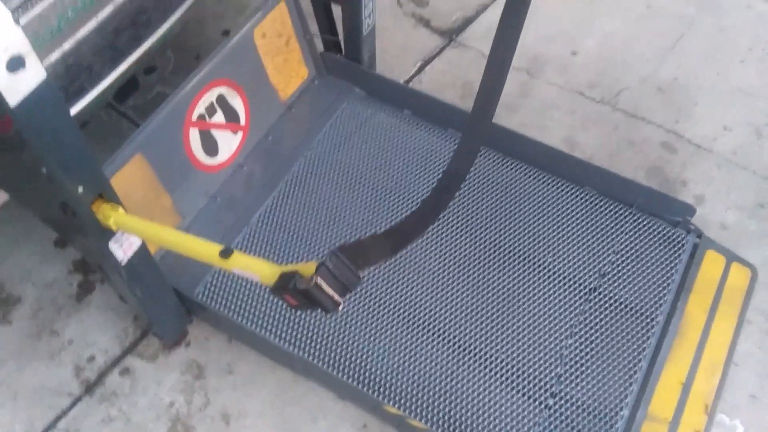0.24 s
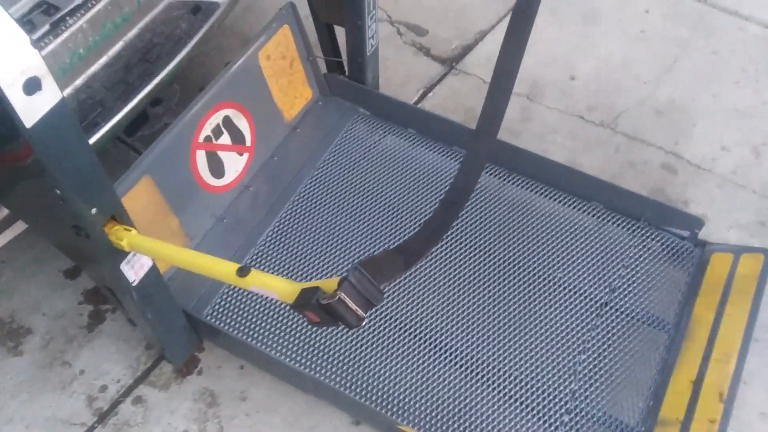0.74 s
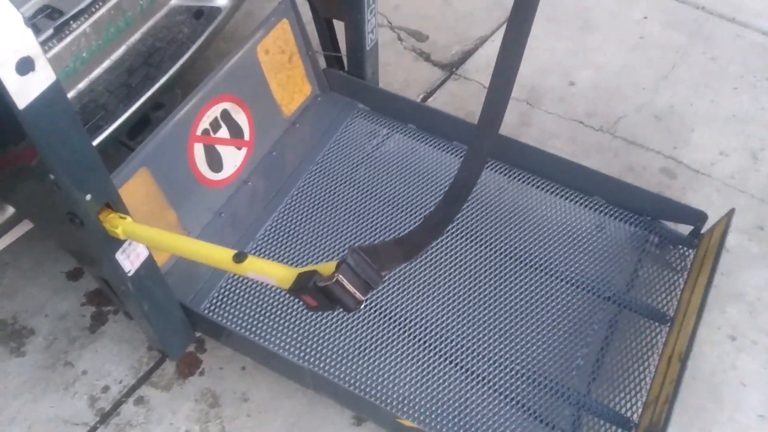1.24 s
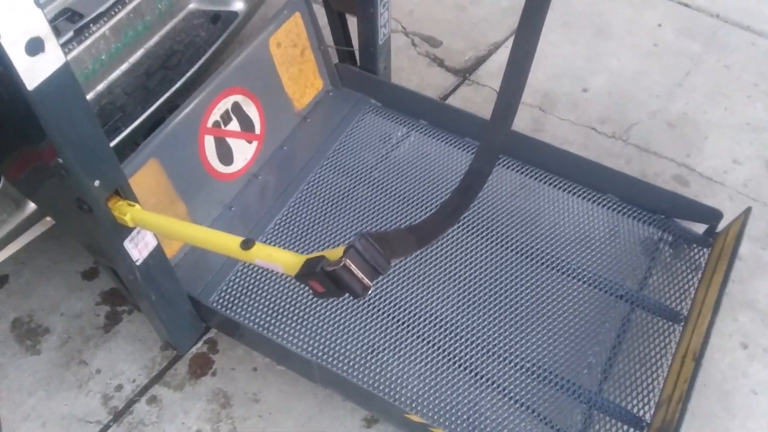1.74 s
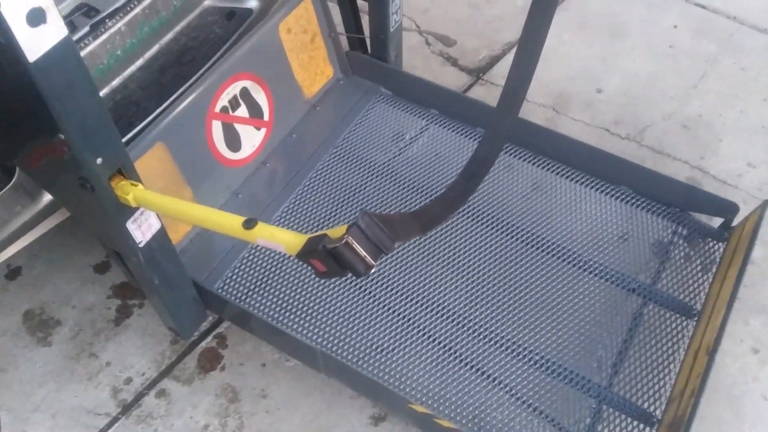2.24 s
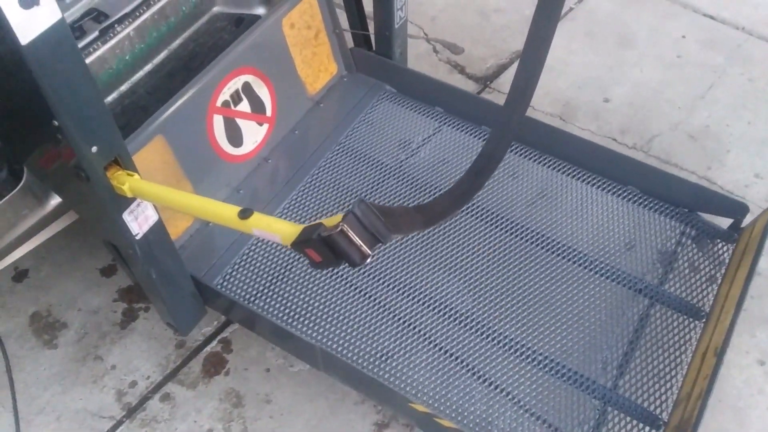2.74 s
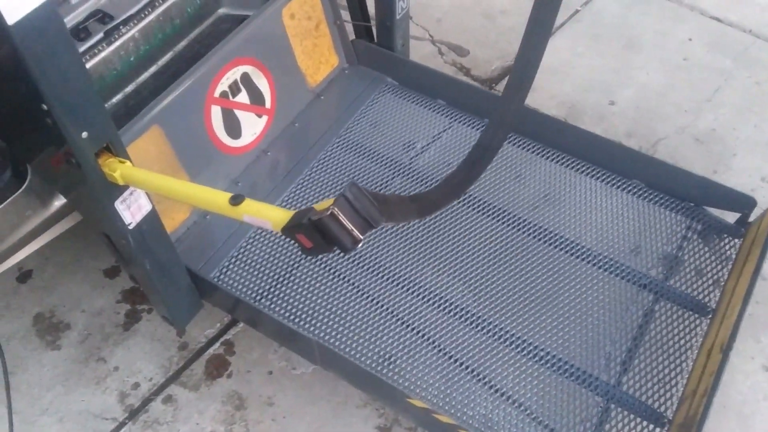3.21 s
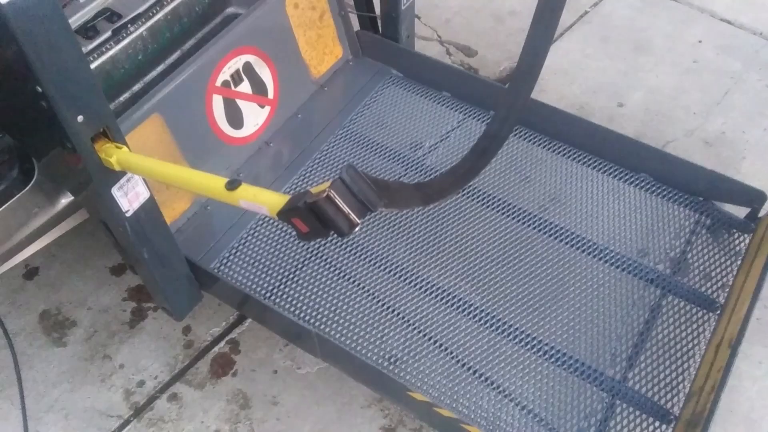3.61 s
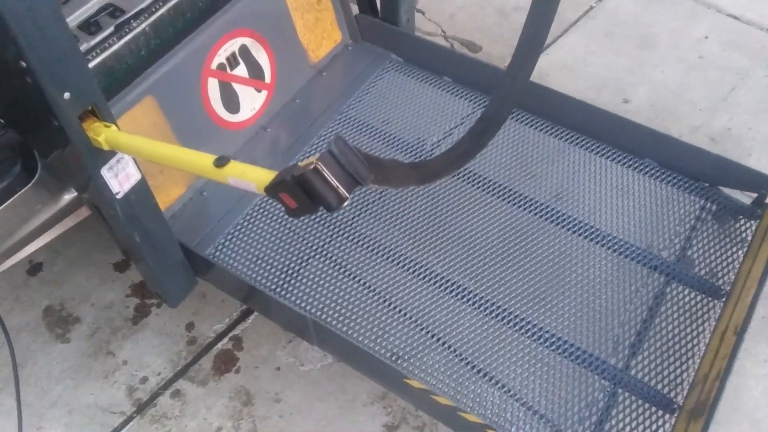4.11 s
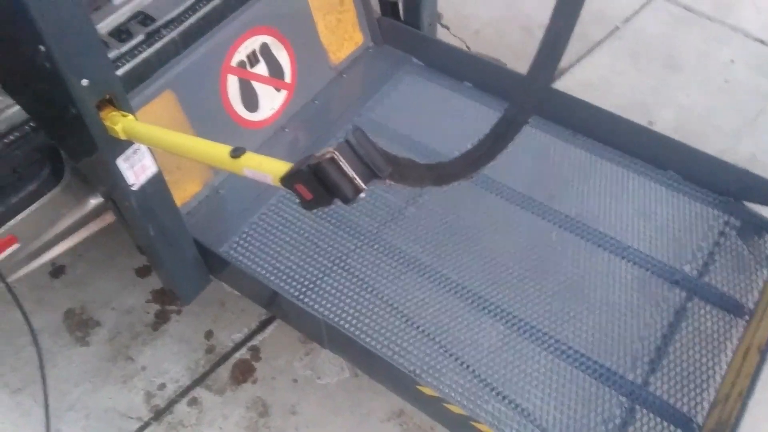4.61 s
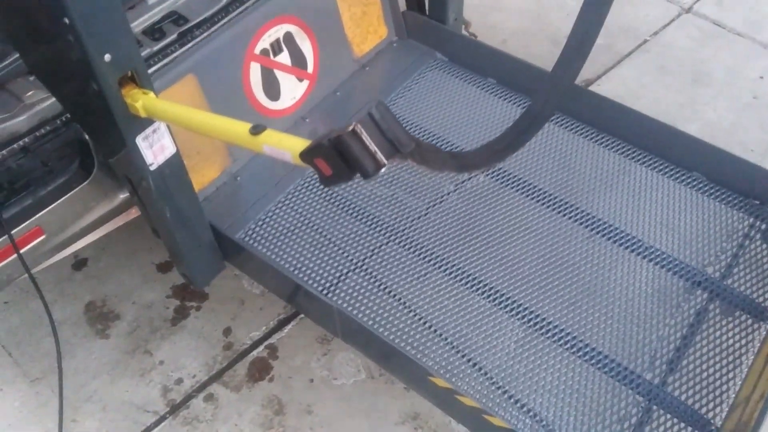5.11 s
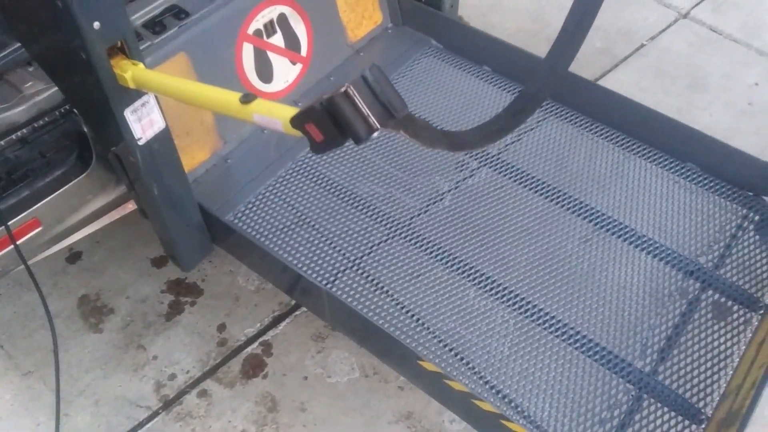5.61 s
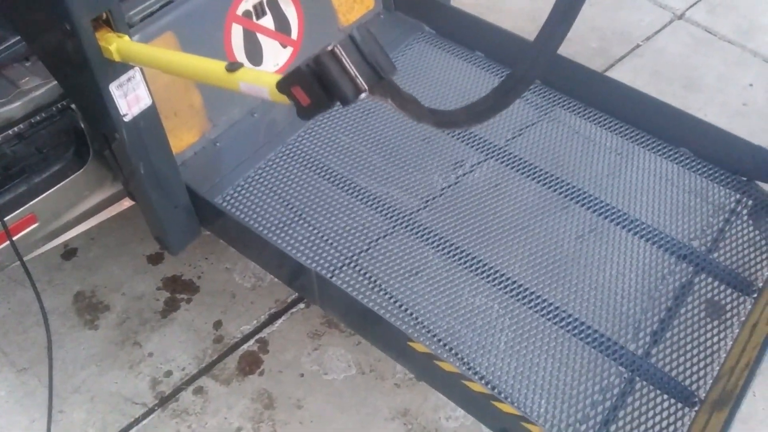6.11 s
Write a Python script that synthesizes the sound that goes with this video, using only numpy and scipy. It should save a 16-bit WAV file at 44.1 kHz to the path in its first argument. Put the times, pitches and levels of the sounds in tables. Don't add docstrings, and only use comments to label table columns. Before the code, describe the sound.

Continuous mechanical whine of a lift motor, already running and never stopping: a low-mid gear hum, a piercing high tone of about six kilohertz and grainy hiss. Individual tones shimmer and beat slowly. A crisp hinge click with a tiny rebound lands early among dull thuds, and low, muffled knocks return near the end. Dry, near, same in both channels, phone quality.

```python
import sys
import numpy as np
from scipy import signal
from scipy.fft import rfft, irfft, next_fast_len
from scipy.io import wavfile
from scipy.ndimage import uniform_filter1d, map_coordinates

SR = 44100
rng = np.random.default_rng(int(sys.argv[2]) if len(sys.argv) > 2 else 0)


def materialize(psi):
    bounded = np.clip(np.atleast_2d(psi).T, -1, 1)
    quanta = np.round(bounded * 32767).astype(np.int16)
    wavfile.write(sys.argv[1], SR, quanta)


def invert_db(level):
    return 10 ** (np.asarray(level, dtype=float) / 20)


N = 280035
MID_LIFT_S = 3.2

# time_s, speed_turns_per_s
SHAFT = [(0.0, 89.48), (0.1, 90.28), (0.3, 90.8), (0.55, 89.79), (1.2, 88.94), (1.9, 89.0), (2.4, 88.57),
         (2.95, 88.4), (3.15, 88.73), (3.35, 88.45), (3.65, 88.51), (3.95, 87.97), (4.9, 87.83),
         (5.0, 88.31), (5.4, 87.97), (6.0, 88.12), (6.05, 88.61), (6.3, 88.99)]
# frequency_hz, level_db (in 18 Hz)
OIL_HISS = [(177, -69), (265, -64), (531, -60.5), (708, -58.5), (1239, -60), (1416, -65), (1593, -60),
            (1770, -66.5), (1947, -66), (2124, -70.5), (2389, -72), (3009, -61.5), (3186, -64.5),
            (3717, -69.5)]
# frequency_hz, level_db (in 18 Hz)
BRUSH_HISS = [(3717, -71), (4900, -69), (5300, -62.5), (6000, -66), (6500, -61), (8053, -68), (8938, -78),
              (9558, -72.5), (10354, -79), (11328, -76), (12124, -81), (12744, -75.5), (14600, -80),
              (15400, -76)]
HISS_SPECTRUM = OIL_HISS + BRUSH_HISS[1:]


def unit(x):
    return x / np.sqrt(np.mean(np.abs(x) ** 2, -1, keepdims=True) + 1e-20)


def along(points, hz):
    f, v = np.transpose(points)
    return np.interp(np.log(hz + 1), np.log(f + 1), v)


def curves(rows, t):
    s, *columns = np.transpose(rows)
    return np.array([np.interp(t, s, column) for column in columns])


def wander(count, t, rate):
    knots = rng.standard_normal((count, 400))
    return np.array([map_coordinates(k, [t * rate]) for k in knots])


def filtered(x, response):
    size = next_fast_len(N + 8192)
    return irfft(rfft(x, size) * response(np.fft.rfftfreq(size, 1 / SR)), size)[..., :N]


def shaft_angle():
    return np.cumsum(curves(SHAFT, np.arange(N) / SR)[0]) / SR


def hiss(angle):
    # time_s, oil_level_db, brush_level_db
    load_levels = [(0.0, -1, -0.5), (6.35, -0.5, 0)]
    oil_db, brush_db = curves(load_levels, np.arange(N) / SR)
    rumble = [(20, -56), (60, -70.5), (110, -75)]

    def colour(hz):
        return invert_db(along(rumble + HISS_SPECTRUM, hz) + 31.0)

    def oil_share(hz):
        return 1 / (1 + (hz / 3700) ** 4)

    oil = filtered(rng.standard_normal(N), lambda hz: colour(hz) * np.sqrt(oil_share(hz)))
    pulse = unit(1 + 0.15 * np.cos(2 * np.pi * angle) + 0.22 * np.cos(4 * np.pi * angle + 1))
    brush = filtered(pulse * rng.standard_normal(N), lambda hz: colour(hz) * np.sqrt(1 - oil_share(hz)))
    return invert_db(oil_db) * oil + invert_db(brush_db) * brush


def frame():
    # start_s, peak_db, mode_hz, t60_s
    knocks = [(0, -36, 545, .1), (.046, -35, 630, .1), (.078, -36, 650, .09), (.185, -38, 640, .12),
              (.256, -36, 550, .16), (.262, -39, 800, .1), (.3, -38, 500, .14), (.335, -39, 650, .1),
              (4.059, -41, 390, .13), (5.76, -37, 330, .06), (5.762, -38, 200, .06), (5.872, -37, 400, .08),
              (5.874, -42, 270, .06), (5.912, -36, 430, .07), (5.914, -37, 310, .06),
              (5.917, -35, 190, .06)]
    out, t = np.zeros(N + SR), np.arange(SR // 3) / SR
    onset = 1 - np.exp(-t / 0.0017)
    for start_s, db, hz, t60 in knocks:
        decay = invert_db(db + 4.5 - 60 * t / t60)
        out[round(abs(start_s) * SR):][:len(t)] += decay * onset * np.sin(2 * np.pi * hz * t)
    return out[:N]


def flap():
    # start_s, peak_db
    clicks = [
        (.2103, -14.5),
        (.2165, -26),
    ]
    # frequency_hz, level_db, t60_s
    hinge_modes = [(2590, -9, .04), (4540, -2, .016), (5850, 0, .016), (6940, -2, .016), (8100, -2, .012),
                   (13000, -12, .01)]
    out, t = np.zeros(N + SR), np.arange(SR // 8) / SR
    onset = 1 - np.exp(-t / 0.0003)
    for start_s, db in clicks:
        ring = 0
        for hz, level_db, t60 in hinge_modes:
            ring = ring + invert_db(level_db - 60 * t / t60) * np.cos(2 * np.pi * hz * (t - 0.0006))
        crack = 0.98 * invert_db(-60 * t / 0.011) * np.diff(rng.standard_normal(len(t) + 1))
        out[round(start_s * SR):][:len(t)] += invert_db(db - 8.5) * onset * (ring + crack)
    return out[:N]


def bearing(angle):
    # shaft_multiple, level_db
    ball_tones = [(3.42, -67), (4.42, -66), (7.33, -61), (7.42, -62), (7.655, -64), (8.345, -59),
                  (8.655, -61), (9.345, -59), (10.345, -61), (10.655, -61), (11.345, -62), (11.655, -63),
                  (12.31, -58), (12.655, -65), (13.31, -62), (13.655, -62), (14.33, -61), (14.655, -63),
                  (15.655, -65), (16.655, -63), (17.31, -61), (17.655, -61), (18.31, -52.5), (19.31, -65),
                  (24.31, -74), (25.31, -73), (27.655, -73), (29.31, -70)]
    t, sample_t = np.arange(0, N + 256, 256) / SR, np.arange(N) / SR
    orders, db = np.transpose(ball_tones)
    settle_db = -1.2 * (t - MID_LIFT_S) * (orders[:, None] > 17)
    swell = invert_db(db[:, None] + 1.5 + settle_db) * unit(invert_db(2.4 * wander(count=len(db), t=t, rate=2.5)))
    slip = rng.uniform(0, 2 * np.pi, (len(db), 1)) + 0.6 * wander(count=len(db), t=t, rate=5.5)
    out = np.zeros(N)
    for order, gain, phase in zip(orders, swell, slip):
        tone = np.sin(2 * np.pi * order * angle + np.interp(sample_t, t, phase))
        out += np.sqrt(2) * np.interp(sample_t, t, gain) * tone
    return out


def swells(t):
    # shaft_multiple, mid_lift_db, drift_db_per_s
    moving_tones = [(3, -59.2, 2.4), (6, -50.9, -0.9), (7, -53.5, -1.0), (8, -48.7, 0.8), (9, -48.3, 1.1),
                    (10, -43.7, 1.4), (12, -52.9, 0.4), (14, -48.5, 2.0), (18, -43.7, -0.2),
                    (23, -52.7, -2.8), (29, -55.7, -0.6), (33, -52.1, -0.3), (34, -46.1, -0.9),
                    (36, -52.6, -1.1), (46, -54.4, 0.1), (59, -60.6, 0.3), (66, -56.0, -0.6),
                    (70, -53.1, 0.4), (71, -53.9, 0.9), (73, -47.5, 1.9), (74, -46.6, -0.0),
                    (107, -63.2, 0.9), (108, -53.9, -0.6), (113, -63.2, 1.3), (129, -69.5, 3.0),
                    (144, -62.4, -0.1)]
    # shaft_multiple,
    # amplitude_share, swell_period_s, loudest_s
    path_echoes = [(3, 0.3, 6.78, 2.4), (6, 0.35, 3.82, 6.35), (7, 0.29, 5.05, 0.38),
                   (8, 0.13, 0.9, 3.76), (9, 0.13, 3.57, 0.64), (10, 0.08, 1.38, 2.63),
                   (12, 0.51, 5.27, 3.56), (14, 0.24, 5.56, 3.04), (18, 0.11, 0.89, 2.61),
                   (23, 0.41, 2.32, 3.97), (29, 0.53, 7.0, 4.99), (33, 0.18, 0.74, 2.62),
                   (34, 0.4, 5.04, 3.82), (36, 0.8, 3.45, 3.11), (46, 0.68, 2.72, 3.07),
                   (59, 0.26, 1.29, 2.99), (66, 0.34, 4.09, 6.52), (70, 0.7, 3.32, 3.69),
                   (71, 0.27, 1.46, 2.61), (73, 0.36, 3.06, 2.91), (74, 0.31, 1.5, 2.59),
                   (107, 0.24, 1.96, 4.16), (108, 0.74, 4.45, 3.22), (113, 0.29, 1.43, 3.85),
                   (129, 0.37, 1.72, 3.55), (144, 0.35, 3.83, 1.17),
                   (8, 0.24, 4.58, 2.76), (10, 0.15, 3.15, 2.07), (12, 0.34, 2.8, 3.22),
                 (18, 0.34, 5.19, 2.94), (23, 0.65, 7.0, 5.75), (23, 0.23, 1.16, 2.95),
                 (29, 0.27, 1.55, 4.2), (33, 0.18, 7.0, 3.31), (34, 0.54, 4.47, 2.11),
                 (36, 0.74, 4.26, 0.5), (36, 0.62, 3.75, 2.07), (46, 0.41, 2.64, 1.92),
                 (46, 0.16, 1.57, 2.94), (59, 0.48, 2.52, 2.94), (66, 0.42, 1.51, 2.6),
                 (70, 0.35, 3.13, 1.66), (71, 0.8, 4.83, 1.87), (73, 0.61, 1.82, 3.24),
                 (73, 0.23, 1.68, 2.36), (74, 0.34, 1.4, 3.35), (74, 0.24, 6.65, 1.94),
                 (107, 0.75, 5.0, -0.18), (108, 0.6, 3.18, 4.7), (108, 0.42, 2.93, 0.32),
                 (113, 0.47, 2.65, 2.6), (129, 0.36, 1.34, 2.64), (144, 0.33, 1.7, 4.39),
                 (144, 0.25, 0.99, 2.56)]
    gain = {order: invert_db(db + drift * (t - MID_LIFT_S)) for order, db, drift in moving_tones}
    for order, share, period_s, loudest_s in path_echoes:
        echo = share * np.exp(2j * np.pi * (t - loudest_s) / period_s)
        gain[order] = gain[order] * np.abs(1 + echo)
    return gain


def whine(angle):
    # shaft_multiple, level_db
    clear_tones = [(5, -58), (13, -53), (17, -56), (19, -57), (20, -56), (28, -64), (30, -61), (32, -58),
                   (37, -56), (38, -56), (39, -61), (40, -61), (44, -63), (45, -61), (47, -61), (53, -61),
                   (54, -60), (57, -58),
                   (64, -57), (69, -57), (75, -55), (76, -53), (80, -55), (90, -57), (92, -60), (93, -62),
                   (104, -65), (106, -66), (109, -58), (115, -64), (122, -65), (126, -66), (128, -64),
                   (130, -62), (132, -67), (133, -68), (135, -67), (145, -67), (149, -67), (178, -70),
                   (112, -69), (124, -69), (125, -69), (148, -70), (62, -66), (63, -59), (140, -70),
                   (160, -69)]
    # time_s, level_db
    slot_levels = [(0.0, -51.0), (0.25, -39.8), (0.4, -48.8), (0.9, -36.4), (1.55, -41.0), (2.05, -35.9),
                   (2.4, -39.2), (2.85, -38.0), (3.35, -46.3), (3.9, -41.3), (4.1, -40.7), (4.35, -34.2),
                   (4.9, -37.2), (5.05, -45.7), (5.25, -39.1), (5.45, -45.2), (5.95, -37.2), (6.3, -35.4)]
    # frequency_hz, excess_db
    faint_excess = [(300, -3), (2200, 4), (3600, 0), (5000, 1), (6800, 3), (7600, 0), (9000, 5.5),
                    (12500, 6), (15000, 3)]
    slot_order, top_order, steps = 72, 179, 2048
    t = np.interp(np.arange(int(angle[-1]) + 2), angle, np.arange(N) / SR)
    k = np.arange(top_order + 1)
    hz = k * np.mean(SHAFT, 0)[1]
    db = along(HISS_SPECTRUM, hz) + along(faint_excess, hz) + 2.5 * rng.standard_normal(len(k))
    for order, level_db in clear_tones:
        db[order] = level_db

    gain = invert_db(db[:, None] + 0.38) * unit(invert_db(2.22 * wander(count=len(k), t=t, rate=1.648)))
    flutter = unit(invert_db(1.0 * wander(count=len(k), t=t, rate=3.1)))
    for order, swell in swells(t).items():
        gain[int(order)] = swell * flutter[int(order)] * invert_db(0.45)
    gain[slot_order] = invert_db(curves(slot_levels, t)[0] + 0.47)
    gain[:2] = 0
    gain[k < 10] *= invert_db(-1.05)

    shake = wander(count=len(k), t=t, rate=14) + 1j * wander(count=len(k), t=t, rate=11)
    loose = 0.094 + 0.16 * (k[:, None] < 10)
    lag_turns = 0.00053 * wander(count=1, t=t, rate=27) + 0.00096 * wander(count=1, t=t, rate=6.7)
    lag_phase = 2 * np.pi * k[:, None] * lag_turns
    phase = rng.uniform(0, 2 * np.pi, (len(k), 1)) + lag_phase
    near = k[70:75, None]
    phase[70:75] = np.pi / 2 * (near % 2) + 1.7 * (near == 74) + lag_phase[70:75]

    spectrum = gain * (1 + loose * shake) * np.exp(1j * phase)
    turns = irfft(spectrum, steps, axis=0) * steps / np.sqrt(2)
    turns = np.vstack([turns, turns[:1]])
    return map_coordinates(turns, [angle % 1 * steps, angle], order=1)


def scene():
    angle = shaft_angle()
    mix = hiss(angle) + frame() + flap() + bearing(angle) + whine(angle)
    return np.tile(mix, (2, 1))


def starve(x):
    starved_frames = [8, 15, 41, 58, 77, 81, 100, 103, 108, 121, 136, 171, 191, 193, 207, 210, 212, 214,
                      223, 228, 242, 246, 261, 286, 289]
    starved_runs = [(61, 2), (112, 2), (152, 2), (160, 2), (163, 2), (182, 2), (201, 2), (238, 3)]
    # frequency_hz, step_db
    coarseness = [(200, 21), (450, 25), (800, 23), (1500, 23), (2500, 26), (4200, 24), (9000, 26),
                  (14000, 25), (15500, 30)]
    hop = round(1024 / 48000 * SR)
    n, k = np.arange(2 * hop) + 0.5, np.arange(hop) + 0.5
    window = np.sin(np.pi * n / (2 * hop))
    basis = window * np.cos(np.pi / hop * np.outer(k, n + hop / 2)) * np.sqrt(2 / hop)
    frames = starved_frames + [first + i for first, count in starved_runs for i in range(count)]
    where = (np.array(frames)[:, None] - 1) * hop - 104 + np.arange(2 * hop)
    lines = x[where] @ basis.T
    around = np.exp(uniform_filter1d(np.log(np.abs(lines) + 1e-9), size=61, axis=1))
    step = around * invert_db(along(coarseness, k * SR / (2 * hop)))
    error = (np.round(lines / step) * step - lines) @ basis
    return x + np.bincount(where.ravel(), error.ravel(), N)


def top_cut(x):
    return signal.sosfilt(signal.butter(12, 16780, fs=SR, output="sos"), x)


def record(dry):
    heard = filtered(dry[0], lambda hz: (hz < 15790) / (1 + (130 / (hz + 1)) ** 6))
    mix = np.tile(starve(heard), (2, 1))
    return top_cut(mix)


dry = scene()
out = record(dry)
materialize(out)
```